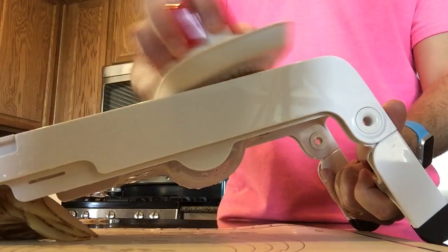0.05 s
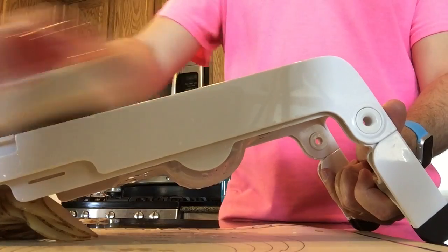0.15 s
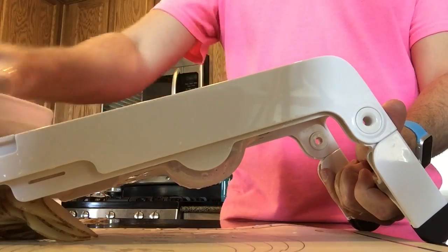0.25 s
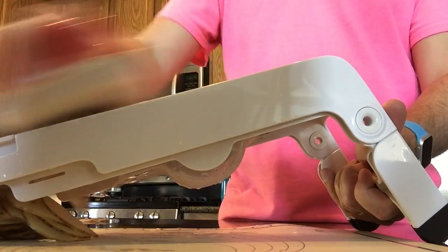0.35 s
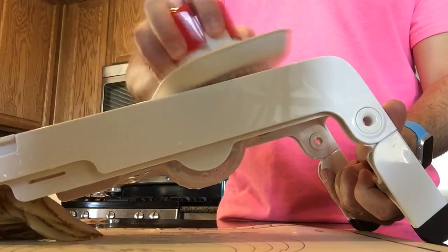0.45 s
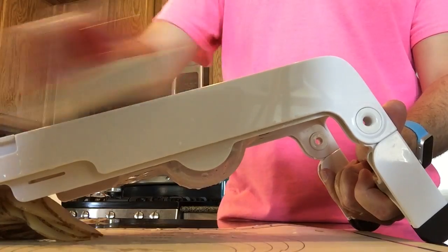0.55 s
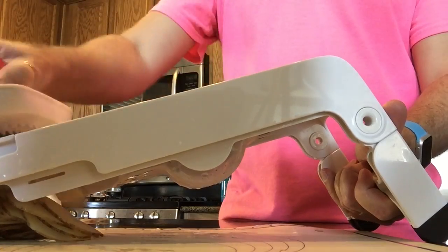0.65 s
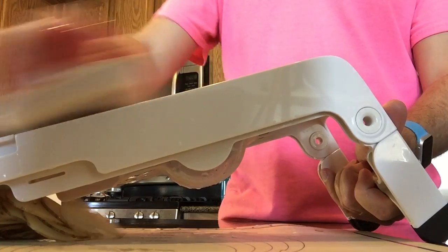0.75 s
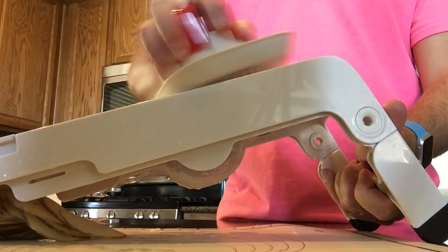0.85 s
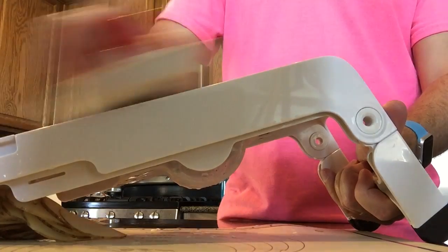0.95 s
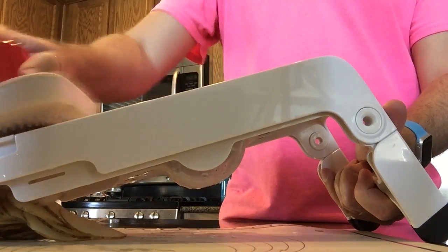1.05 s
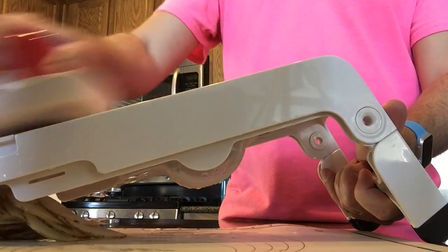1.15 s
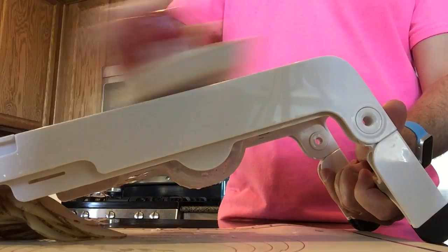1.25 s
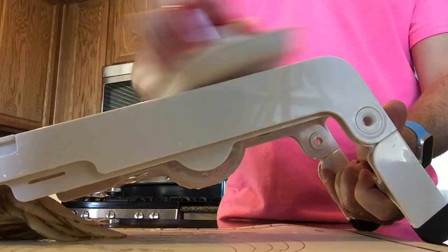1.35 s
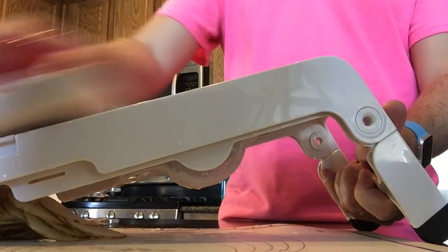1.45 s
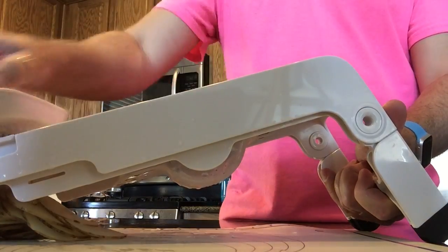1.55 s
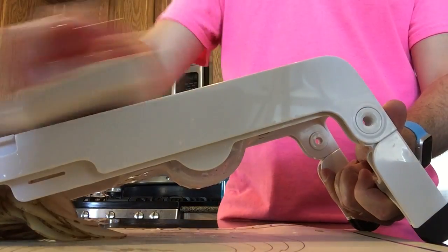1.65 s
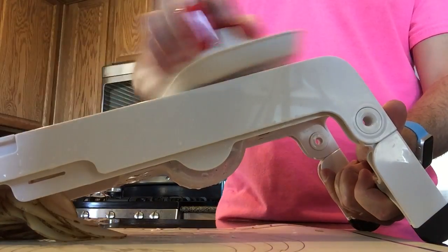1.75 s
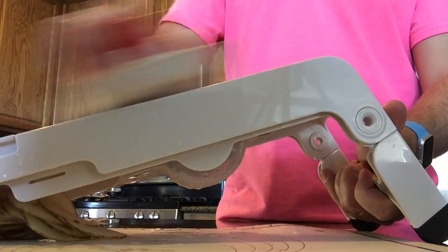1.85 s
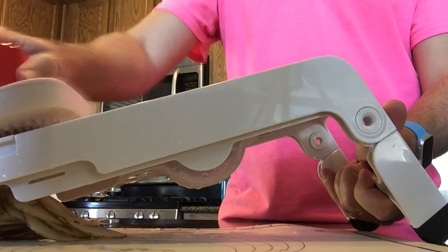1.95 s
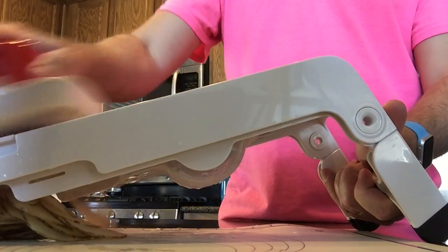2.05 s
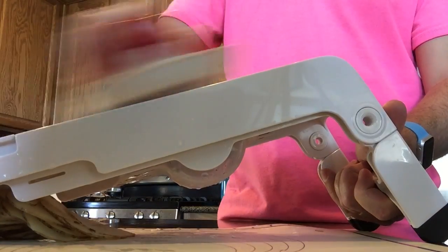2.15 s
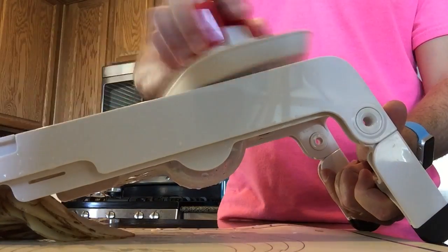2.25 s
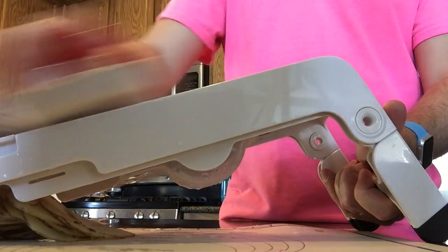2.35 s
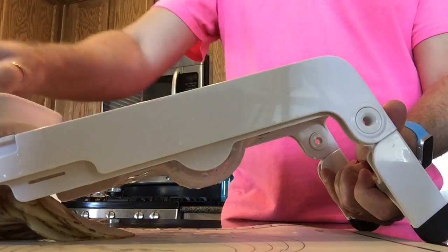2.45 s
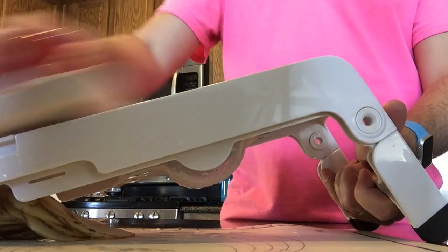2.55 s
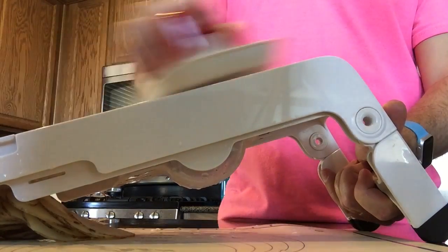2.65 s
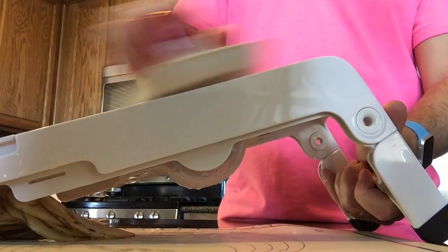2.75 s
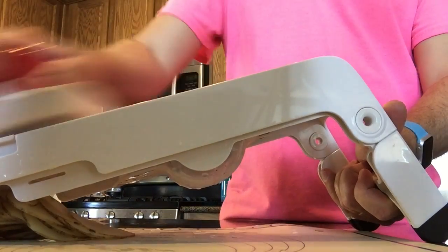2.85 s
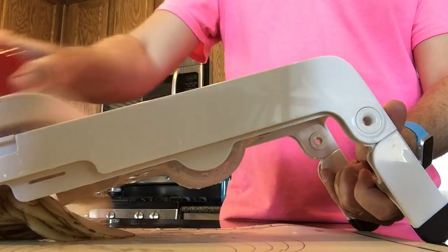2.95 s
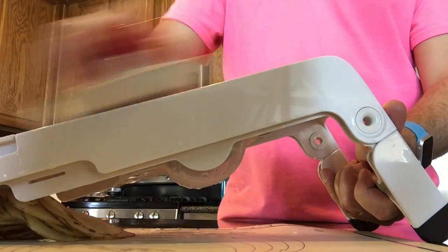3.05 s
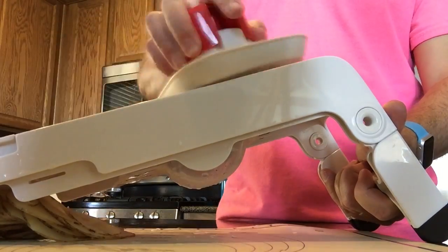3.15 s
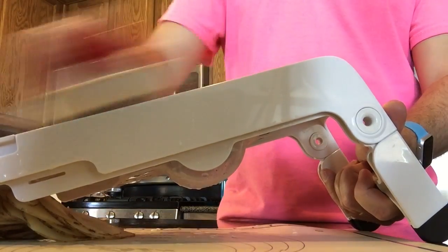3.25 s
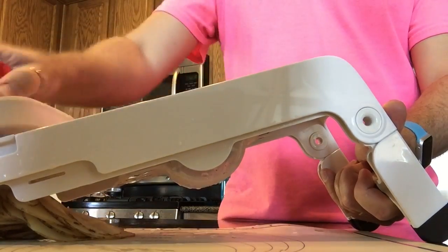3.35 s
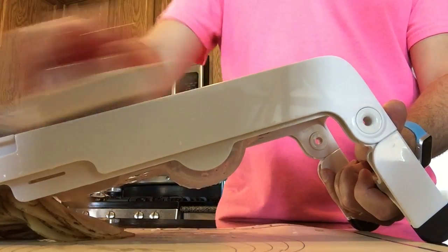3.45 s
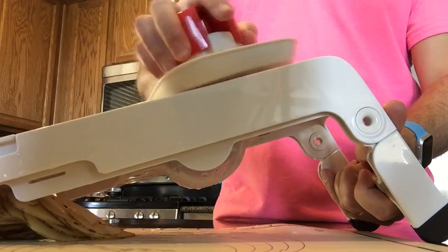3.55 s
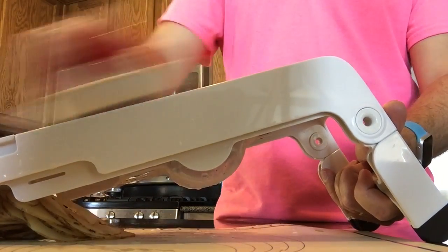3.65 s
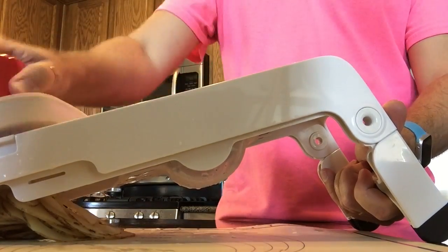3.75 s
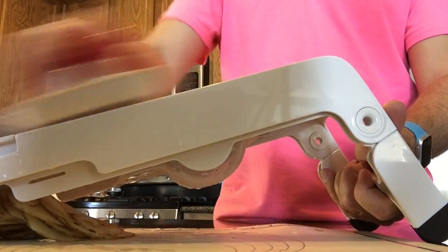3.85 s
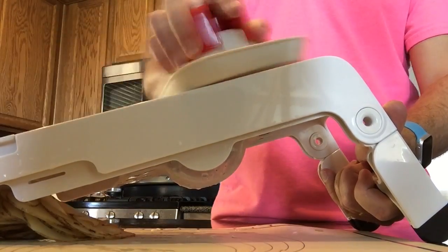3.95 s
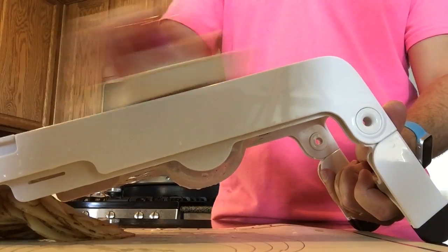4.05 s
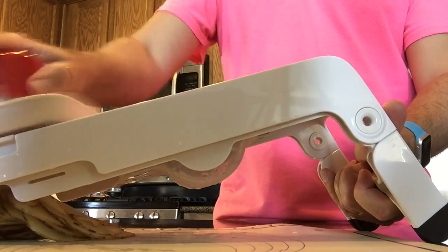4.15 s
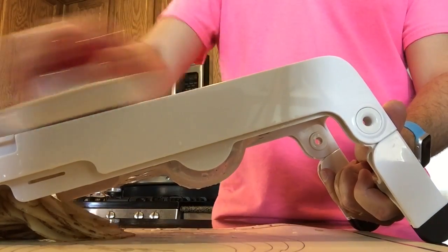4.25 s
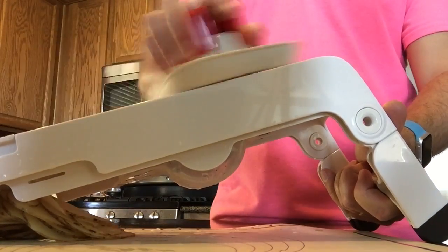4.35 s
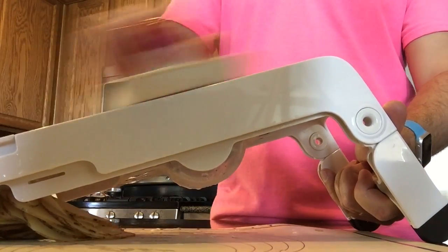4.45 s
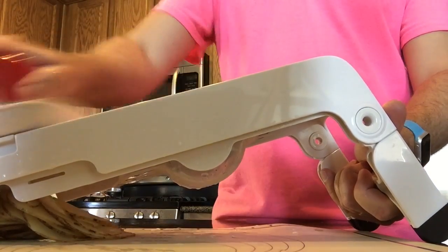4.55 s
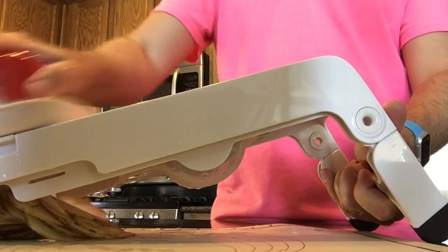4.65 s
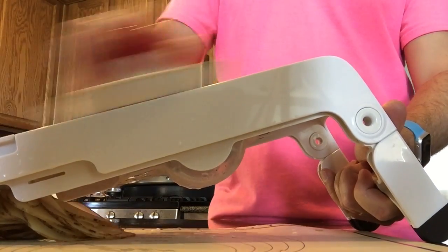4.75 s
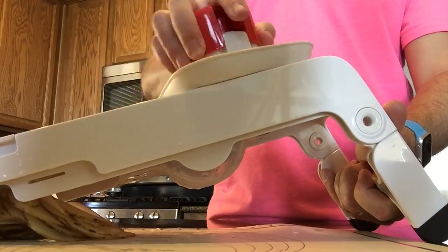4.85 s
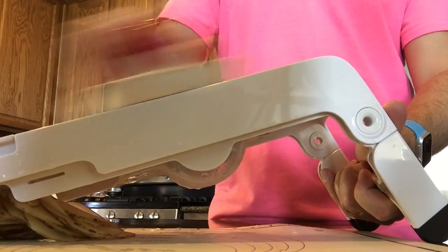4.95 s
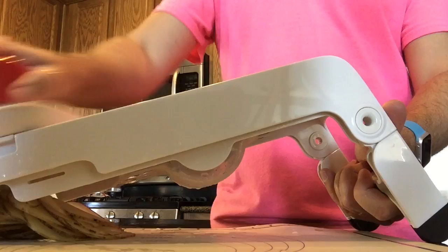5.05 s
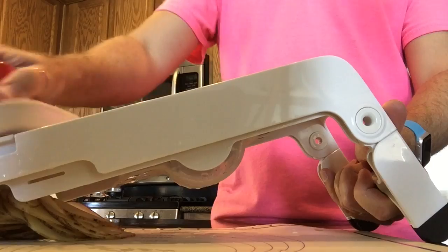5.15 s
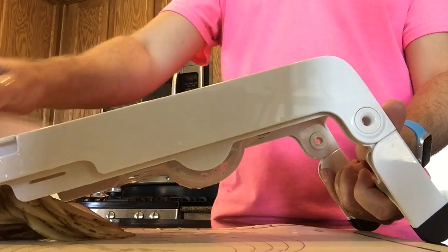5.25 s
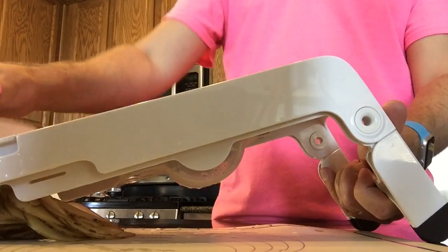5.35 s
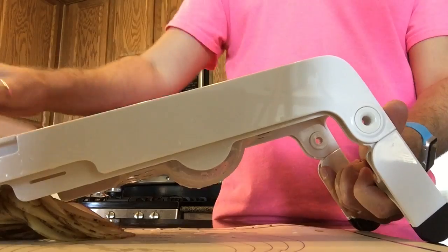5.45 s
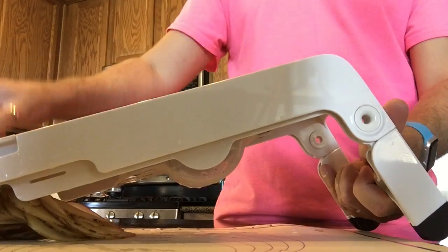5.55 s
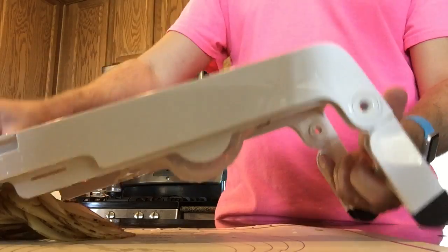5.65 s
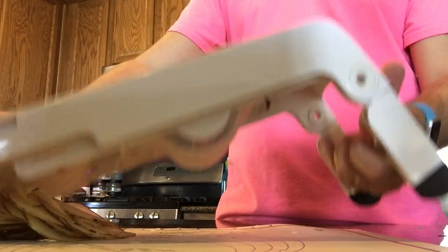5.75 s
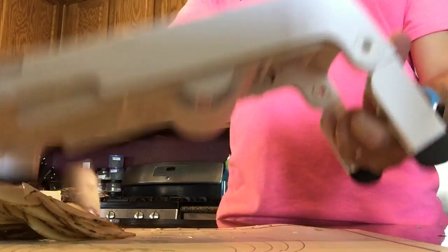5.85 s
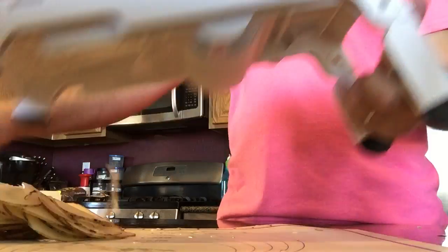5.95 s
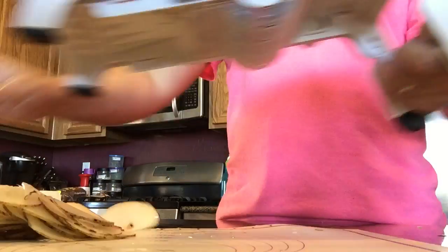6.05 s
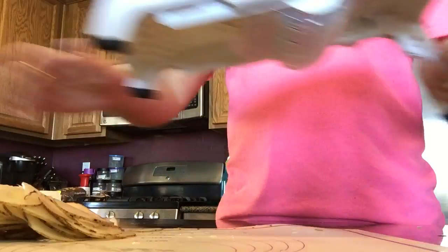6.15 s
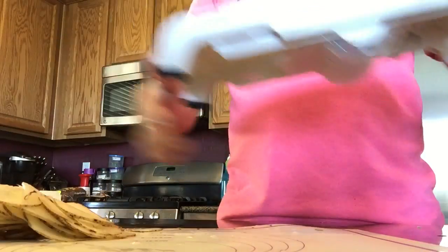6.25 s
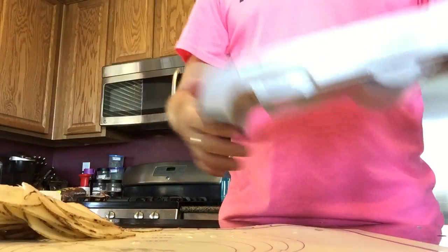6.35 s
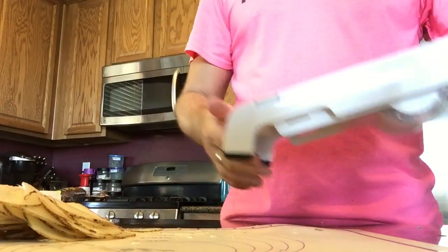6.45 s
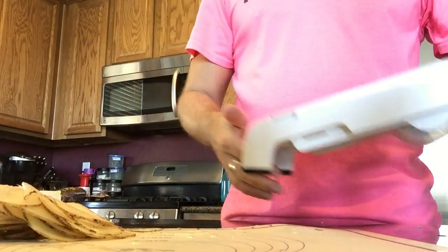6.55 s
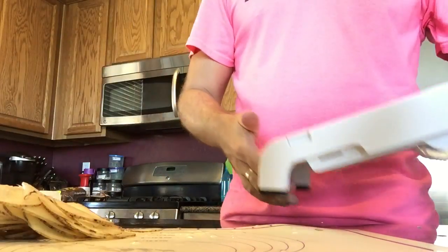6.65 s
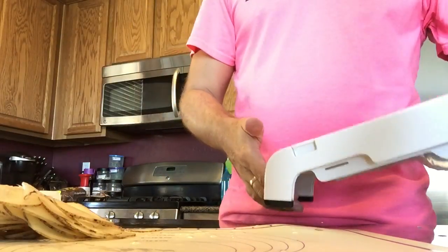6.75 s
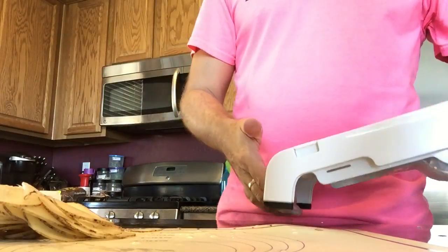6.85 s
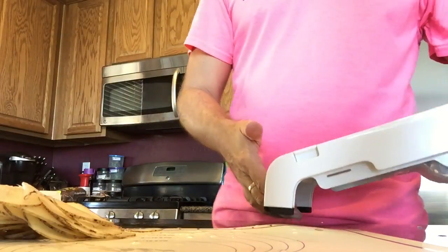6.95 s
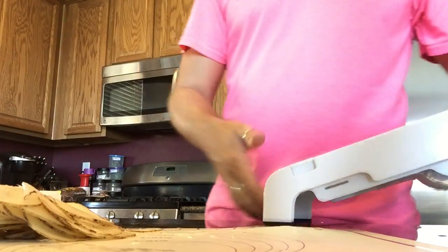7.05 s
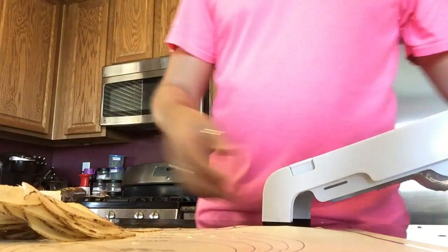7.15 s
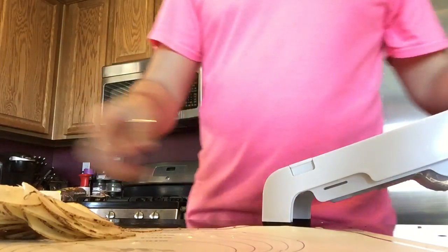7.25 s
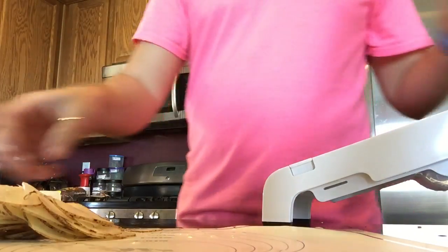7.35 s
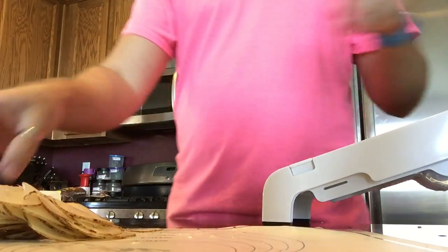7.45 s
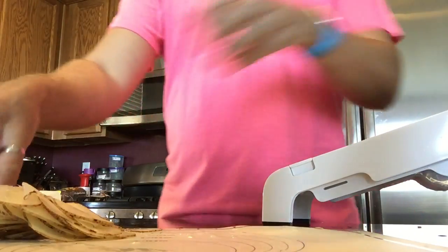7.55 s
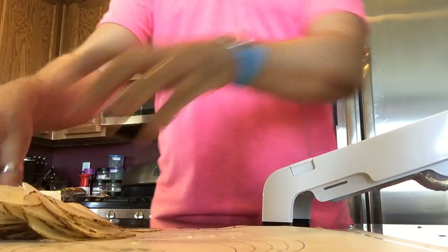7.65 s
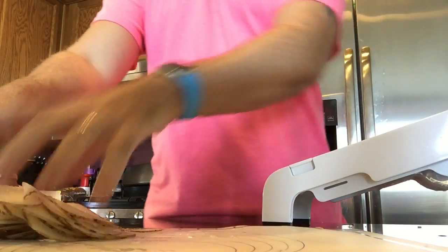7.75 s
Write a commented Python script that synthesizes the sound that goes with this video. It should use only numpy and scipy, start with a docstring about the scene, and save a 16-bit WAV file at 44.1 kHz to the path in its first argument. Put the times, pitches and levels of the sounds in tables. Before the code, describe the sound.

Very close to the microphone, a plastic guard holding a potato shuttles along a hollow plastic slicer, about two full strokes a second. Hard clacks crowd around ribbed rasps and short wet hisses at the blade. After five seconds it stops; the slicer is lifted and set down with a thump, and hands brush quietly over a low kitchen hum.

```python
"""Potato on a plastic slicer

A potato in a plastic hand guard is driven up and down a slicer, close to the microphone, in a humming kitchen.
Guard clacks: force bursts through frame modes, with a crack and a low push. Potato: shaped noise, a rasp on the
ribbed deck and a hiss at the blade. Then the slicer is lifted and set down (counter and frame modes) and hands
brush, while the blade rings once (short filtered noise). Hum: shaped noise and a wavering drone; the room adds
noise tails."""
import sys
import numpy as np
from scipy import signal
from scipy.fft import rfft, irfft, next_fast_len
from scipy.io import wavfile
from scipy.ndimage import uniform_filter1d, map_coordinates

SR = 44100
rng = np.random.default_rng(int(sys.argv[2]) if len(sys.argv) > 2 else 0)


def unload_audio(sound):
    """Save the sound as a 16-bit wav file, at the path given as the first command line argument."""
    columns = np.transpose(np.atleast_2d(sound))
    # keep every value between -1 and 1, then stretch to whole-number steps
    steps = np.round(np.clip(columns, -1, 1) * 32767)
    wavfile.write(sys.argv[1], SR, steps.astype(np.int16))


N = 343980

# Appliance and air noise spectrum: (frequency [Hz], relative density [dB per Hz])
HUM_SPECTRUM = [(15, -56), (25, -34.5), (48, -2.5), (70, 7.5), (86, -8), (129, 0), (152, -12), (261, -5.5),
                (315, -12), (447, -13.5), (634, -21), (1590, -17), (2250, -32.5), (6100, -38),
                (15700, -63.5)]
# Wavering motor tones: (frequency [Hz], width [Hz], relative level [dB])
DRONE_TONES = [(222, 36, 0), (444, 12, -6)]
# Room decay: (frequency [Hz], t60 [s])
KITCHEN_T60 = [(150, 0.84), (1500, 0.29), (10000, 0.23)]
# Ticks, swishes and squeaks of hands on skin or plastic, and one short ring of the blade: (time [s], level
# [dB], length [s], centre [Hz], width of each of two filter passes [Hz])
BRUSHES = [(5.988, -58, 0.034, 8400, 1500), (6.019, -44, 0.016, 5000, 4950), (6.634, -55, 0.043, 2300, 494),
           (6.731, -61.5, 0.05, 3800, 395), (6.911, -58, 0.013, 2620, 900), (7.1, -62, 0.031, 3830, 710),
           (7.671, -62.5, .006, 12300, 3946), (7.714, -49, 0.027, 10200, 5060),
           (7.717, -55.5, 0.044, 3880, 495), (7.762, -63, 0.034, 5050, 800),
           (1.662, -43.5, 0.0028, 6600, 6000), (2.49, -53, 0.11, 2190, 70), (4.763, -57, .006, 7000, 7000),
           (5.902, -50, 0.16, 1020, 710)]
# Feet jolting or landing on the counter:
# (time [s], boom peak [dB], click peak re boom [dB], contact [s])
LANDINGS = [(2.372, -28, -26, 0.0042), (5.336, -24.5, 12, 0.002), (6.031, -36, -18, 0.0048),
            (6.918, -22.5, 0, 0.0063), (7.139, -13.5, 4, 0.0022)]
# Counter top modes: (frequency [Hz], width [Hz], relative level [dB])
COUNTER_MODES = [(111, 28.4, -2), (149, 21, -5), (171, 16, 0.5), (317, 30, -3), (836, 78, 6.5)]
# Slicer frame modes: (frequency [Hz], width [Hz], relative level [dB])
FRAME_MODES = [(377, 307, -4), (743, 184, -1.5), (1095, 225, -3), (1372, 211, 0.5), (1605, 220, -2),
               (2112, 285, -2.5), (2690, 272, -5.5), (3112, 306, -6.5), (3840, 470, -12)]
# Wet hiss and crack spectrum: (frequency [Hz], relative density [dB per Hz])
HISS_SPECTRUM = [(2060, -25), (3500, 0.5), (3750, -2), (4040, -4), (4790, -8), (6190, -2.5), (8420, -11.5),
                 (11500, -16), (14700, -19), (15700, -30)]
# Downhill through the blade: (time at full speed [s], held [s], deck rasp [dB], wet hiss [dB])
CUTS = [(.21, 0.049, -37, -37), (.645, 0.043, -31.5, -35.5), (1.053, 0.059, -30.5, -36),
        (1.492, 0.06, -27, -36.5), (1.948, 0.073, -29, -37.5), (2.416, 0.068, -32.5, -39.5),
        (2.875, 0.057, -29, -38.5), (3.33, 0.057, -30, -39), (3.74, 0.048, -31, -39),
        (4.17, 0.046, -29, -35.5), (4.57, 0.057, -31.5, -35), (5.05, 0.088, -28.5, -35.5)]
# Back up the ribbed deck: (time at full speed [s], held [s], deck rasp [dB], wet hiss [dB])
RETURNS = [(0, 0.072, -30.5, -46), (.455, 0.035, -35.5, -45.5), (.83, 0.09, -36.5, -45.5),
           (1.278, 0.099, -39.5, -47), (1.725, 0.062, -33, -45.5), (2.185, .1, -36.5, -47),
           (2.638, 0.13, -36, -45), (3.075, 0.15, -35.5, -45.5), (3.51, 0.088, -32, -42),
           (3.9, 0.12, -37, -46.5), (4.325, 0.091, -35, -43.5), (4.755, 0.17, -34.5, -39.5)]
# Guard and frame dragged or shifted by hand: (time at full speed [s], held [s], deck rasp [dB])
DRAGS = [(1.238, 0.003, -46.5), (2.36, 0.0068, -52), (5.278, 0.04, -39.5), (5.803, 0.025, -42),
         (5.85, 0.073, -54), (5.945, 0.036, -47), (6.073, 0.011, -50.5), (6.925, .005, -43.5),
         (6.995, 0.035, -53.5), (7.144, 0.0091, -35.5)]
# Plastic on plastic: (time [s], body peak [dB], centre [Hz])
CLACKS = [(0.06, -17, 1646), (.076, -12.5, 1557), (.087, -10.5, 1530), (.188, -3.5, 1970),
          (.225, -17.5, 2180), (0.443, -14, 2270), (.453, -8.5, 1860), (0.513, -7.5, 1700),
          (0.563, -24.5, 1290), (.614, -5, 1660), (0.645, -14, 1946), (.685, -8, 1700), (.824, -1.5, 1654),
          (0.828, -5.6, 2010), (0.84, -6, 1803), (0.852, -15.5, 1740), (.863, -18.5, 1740),
          (0.912, -7.5, 1680), (0.972, -16.5, 1410), (1.025, -11.5, 1735), (1.052, -19, 2320),
          (1.082, -15, 1856), (1.096, -2.5, 1720), (1.271, -7, 1840), (1.277, -7, 2092),
          (1.29, -13.5, 1616), (1.356, -3.5, 1677), (1.479, -10.5, 2110), (1.491, -17, 1690),
          (1.503, -20, 2070), (1.532, -7.5, 2210), (1.557, -10.5, 1720), (1.713, -11.5, 2130),
          (1.736, -7, 2287), (1.746, -14.5, 1610), (1.811, -4, 1754), (1.929, -8.5, 1900),
          (1.948, -23, 1640), (1.983, -11, 2150), (2.016, -18.5, 1635), (2.115, -11.5, 1530),
          (2.182, -11, 1830), (2.205, -10.5, 1435), (2.223, -16, 2200), (2.269, -3.5, 1850),
          (2.354, -14.5, 1310), (2.364, -16.5, 1510), (2.407, -19, 2300), (2.417, -9.5, 1466),
          (2.477, -11.5, 1800), (2.63, -5.5, 1340), (2.642, -4, 2530), (2.664, -17.5, 2250),
          (2.712, -5, 1690), (2.732, -2.5, 1820), (2.834, -17.5, 1240), (2.855, -8.5, 1600),
          (2.879, -12, 1660), (2.929, -12.5, 1450), (3.067, -8, 1820), (3.1, -11, 1650),
          (3.149, -6.5, 1867), (3.182, -3.5, 1894), (3.24, -14.5, 1704), (3.258, -15.5, 1253),
          (3.27, -14, 1416), (3.333, -10, 1736), (3.375, -13.5, 1598), (3.319, -23, 1785),
          (3.506, -0.5, 1880), (3.52, -14, 1700), (3.557, -18.5, 2000), (3.59, -10, 1680),
          (3.603, -9, 1770), (3.67, -15.5, 1265), (3.71, -9.5, 1570), (3.737, -20, 2050),
          (3.751, -2.5, 2110), (3.78, -15, 1543), (3.893, -3.5, 2054), (3.922, -19.5, 1450),
          (3.973, -5.5, 1890), (4.004, -10, 1770), (4.14, -16.5, 1740), (4.21, -13.5, 1510),
          (4.299, -13, 2010), (4.324, -0.3, 1830), (4.329, -17.5, 1623), (4.543, -19, 1900),
          (4.571, -3.5, 1820), (4.592, -11.5, 1830), (4.616, -16.5, 2620), (4.696, -26.5, 1510),
          (4.734, -17.5, 1400), (4.762, -20.5, 1400), (4.78, -16, 2260), (5.064, -14.5, 1900),
          (5.09, -21.5, 2040), (5.137, -16.5, 2270), (5.274, -10.5, 1790), (5.297, -24.5, 1340),
          (5.316, -23, 1435), (5.333, -28.5, 1920), (5.35, -22, 1860), (5.453, -40, 1410),
          (5.64, -33, 1420), (5.795, -16.5, 1470), (5.81, -24, 1490), (6.786, -37.5, 1930),
          (6.992, -37, 1530)]

HUM_DB, DRONE_RE_AIR_DB = -51, -4.5
HITS_TO_ROOM_DB, RUBS_TO_ROOM_DB = -15.0, -14
DRAG_HISS_RE_RASP_DB, TABLE_RE_RASP_DB = -9.5, -16
BRIGHTNESS_REF_DB = -49.5  # hiss level at which its treble is unaltered
USUAL_DB, USUAL_HZ = -12, 1700  # reference clack
# Crack: thin, high-pitched parts crack more
CRACK_AT_USUAL_DB, CRACK_DB_PER_FORCE_DB, CRACK_DB_PER_OCTAVE = -32, 0.97, 10
# Push: thick, low-pitched parts thud more
PUSH_AT_USUAL_DB, PUSH_DB_PER_FORCE_DB, PUSH_DB_PER_OCTAVE = -29.5, 0.86, -16.5
BLOW_SCATTER_DB, MODE_SCATTER_DB = 4.5, 2.5  # standard deviations
MIC_CORNER_HZ, TOP_HZ = 42, 15750


def amp(db):
    """Amplitude factor of a level."""
    return 10 ** (np.asarray(db) / 20)


def unit(x):
    """Scale to RMS 1."""
    return x / np.sqrt(np.mean(x ** 2) + 1e-20)


def peak_one(x):
    """Scale to peak 1."""
    return x / np.abs(x).max()


def along(points, hz):
    """Interpolate (Hz, value) points on a log axis."""
    f, v = np.transpose(points)
    return np.interp(np.log(hz + 1), np.log(f + 1), v)


def wobble(knots_per_s):
    """Smooth random curve."""
    knots = rng.standard_normal(int(N * knots_per_s / SR) + 4)
    return map_coordinates(knots, [np.arange(N) * knots_per_s / SR])


def filtered(x, response):
    """Apply a complex response of frequency."""
    m = next_fast_len(len(x) + SR // 4)
    return irfft(rfft(x, m) * response(np.fft.rfftfreq(m, 1 / SR)), m)[:len(x)]


def resonance(f, hz, width_hz):
    """One causal resonance of peak gain 1."""
    return 1j * f * width_hz / (hz * hz - f * f + 1j * f * width_hz)


def mode_sum(f, modes, extra_db):
    """Parallel resonances of alternating sign."""
    return sum((-1) ** k * amp(db + extra_db[k]) * resonance(f, hz, width_hz)
               for k, (hz, width_hz, db) in enumerate(modes))


def patchy(depth_db):
    """White noise with time-frequency patches of random gain."""
    z = signal.stft(rng.standard_normal(N), nperseg=256)[2]
    field = uniform_filter1d(rng.standard_normal(z.shape), size=6, axis=0)
    field = uniform_filter1d(field, size=5, axis=1)
    return signal.istft(z * amp(depth_db * unit(field)), nperseg=256)[1][:N]


def burst(t, rise_s, t60_s):
    """A rough contact force: noise that builds and dies within ms."""
    envelope = (1 - np.exp(-(t / rise_s) ** 2)) * amp(-60 * t / t60_s)
    return rng.standard_normal(len(t)) * envelope


def add_at(out, s, x):
    """Mix x into out from time s."""
    out[round(s * SR):][:len(x)] += x


def hum():
    """Steady appliance and air noise: patchy shaped noise plus noise-driven motor resonances."""
    air = unit(filtered(patchy(depth_db=2.0), lambda f: amp(along(HUM_SPECTRUM, f))))
    drone = unit(filtered(rng.standard_normal(N), lambda f: sum(
        amp(db) * resonance(f, hz, width_hz) for hz, width_hz, db in DRONE_TONES)))
    return amp(HUM_DB + 0.53 * wobble(2.2)) * (air + amp(DRONE_RE_AIR_DB) * drone)


def kitchen(x):
    """Decaying noise tails answer; a fresh one every 1/8 s, as hands and slicer move."""
    out, step = np.zeros(N + SR), SR // 8
    for start in range(0, N, step):
        hz, t, z = signal.stft(rng.standard_normal(SR // 2), SR, nperseg=256)
        decay = amp(-60 * t / along(KITCHEN_T60, hz)[:, None])
        tail = signal.istft(z * decay, SR, nperseg=256)[1]
        wet = signal.fftconvolve(x[start:start + step], tail / np.linalg.norm(tail))
        out[start + 130:][:len(wet)] += wet  # delayed 130 samples
    return out[:N]


def brushes():
    """Hands brush skin or plastic, and the blade rings once: short band-passed noise under rounded envelopes."""
    out, t = np.zeros(N + SR), np.arange(SR // 8) / SR
    for s, db, length_s, hz, width_hz in BRUSHES:
        noise = rng.standard_normal(len(t))
        swish = unit(filtered(noise, lambda f: resonance(f, hz, width_hz) ** 2))
        envelope = np.sin(np.pi * np.clip(t / length_s, 0, 1) ** 0.38)
        add_at(out, s, amp(db) * swish * envelope)
    return out[:N]


def frame(f, struck_db=np.zeros(len(FRAME_MODES))):
    """Hollow plastic frame: modes weighted by the struck spot; too small to radiate much bass."""
    return mode_sum(f, FRAME_MODES, struck_db) * 1j * f / (700 + 1j * f)


def counter(f):
    """Modes of the counter top."""
    return mode_sum(f, COUNTER_MODES, np.zeros(len(COUNTER_MODES)))


def landings():
    """The counter booms and the frame rattles as the feet land."""
    out, t = np.zeros(N + SR), np.arange(SR // 3) / SR
    for s, boom_db, click_db, contact_s in LANDINGS:
        push = np.sin(np.pi * np.clip(t / contact_s, 0, 1))  # rubber feet give a soft blow
        boom = filtered(push + 0.31 * burst(t, 0.0031, 0.13), counter)
        click = filtered(burst(t, 0.00092, 0.03),
                         lambda f: frame(f) + 0.039 * resonance(f, 4100, 3400))
        add_at(out, s, amp(boom_db) * (peak_one(boom) + amp(click_db) * peak_one(click)))
    return out[:N]


def stroke_gains(rows, rise_s, fall_s, sag_db_per_s):
    """Rasp and hiss gains of strokes: held, sagging, weaker where the hand is slower."""
    t = np.arange(N) / SR
    rasp, hiss = np.zeros((2, N))
    for s, held_s, rasp_db, hiss_db in rows:
        away = np.clip(np.maximum((s - t) / rise_s, (t - s - held_s) / fall_s), 0, None)
        sag_db = sag_db_per_s * np.clip(t - s, 0, held_s)
        rasp += amp(rasp_db - sag_db - 7.4 * away ** 0.95)
        hiss += amp(hiss_db - sag_db - 11.6 * away ** 0.66)
    return np.array([rasp, hiss])


def rubbing():
    """Stick-slip grains shake the frame's modes; the wet cut face hisses."""
    drags = [(s, held_s, db, db + DRAG_HISS_RE_RASP_DB) for s, held_s, db in DRAGS]
    rasp, hiss = (stroke_gains(CUTS, rise_s=0.018, fall_s=0.013, sag_db_per_s=13)
                  + stroke_gains(RETURNS, rise_s=0.015, fall_s=0.025, sag_db_per_s=32)
                  + stroke_gains(drags, rise_s=0.011, fall_s=0.018, sag_db_per_s=30))
    grip = amp(2.2 * wobble(80) + 3 * wobble(350))  # uneven slips, shared by deck and wet
    tears = (rng.random(N) < 400 / SR) * rng.laplace(0, 5, N)  # fibres snapping, about 400 a second
    deck = unit(filtered(grip * patchy(depth_db=5.0) + tears, frame))
    wet = unit(filtered(grip ** 0.65 * patchy(depth_db=3.0),
                        lambda f: amp(along(HISS_SPECTRUM, f))))
    treble = filtered(wet, lambda f: 1 / (1 + (8000 / (f + 1)) ** 4))
    wet += treble * ((hiss / amp(BRIGHTNESS_REF_DB)) ** 0.45 - 1)  # fast strokes are brighter
    # The push reaches the counter
    table = unit(filtered(rng.standard_normal(N), lambda f: resonance(f, 140, 140)))
    return rasp * (deck + amp(TABLE_RE_RASP_DB) * table) + hiss * wet


def clacks():
    """Each contact drives the frame modes near the struck spot, with a crack and a low push."""
    out, t = np.zeros(N + SR), np.arange(SR // 10) / SR
    for s, db, hz in CLACKS:
        spot_db = rng.normal(0, MODE_SCATTER_DB, len(FRAME_MODES))
        force_db, octaves = db - USUAL_DB, np.log2(hz / USUAL_HZ)
        crack_db = CRACK_AT_USUAL_DB + CRACK_DB_PER_FORCE_DB * force_db + CRACK_DB_PER_OCTAVE * octaves
        crack_db += rng.normal(0, BLOW_SCATTER_DB)
        push_db = PUSH_AT_USUAL_DB + PUSH_DB_PER_FORCE_DB * force_db + PUSH_DB_PER_OCTAVE * octaves
        push_db += rng.normal(0, BLOW_SCATTER_DB)
        force = burst(t, 0.00096, 0.013) + 0.32 * burst(t, 0.0019, 0.035)
        body = filtered(force, lambda f: frame(f, spot_db) * resonance(f, hz, 0.65 * hz))
        crack = filtered(burst(t, 0.0013, 0.018),
                         lambda f: amp(along(HISS_SPECTRUM, f)) * resonance(f, 5600, 6200) ** 2)
        push = np.sin(2 * np.pi * rng.uniform(140, 191) * t)
        push *= (1 - np.exp(-t / 0.0053)) * amp(-60 * t / 0.038)
        clack = amp(db) * peak_one(body) + amp(crack_db) * peak_one(crack) + amp(push_db) * push
        add_at(out, s, clack)
    return out[:N]


def scene():
    """Direct sound, room answer and hum, summed."""
    hits = clacks() + landings()
    rubs = rubbing() + brushes()
    room = kitchen(amp(HITS_TO_ROOM_DB) * hits + amp(RUBS_TO_ROOM_DB) * rubs)
    return (hits + rubs + room + hum())[None]


def record(dry):
    """The small microphone loses the deepest bass; nothing is kept above the band limit."""
    def response(hz):
        return (1j * hz / (MIC_CORNER_HZ + 1j * hz)) ** 2 * (hz < TOP_HZ)
    return filtered(dry[0], response)[None]


dry = scene()
out = record(dry)
unload_audio(out)
```